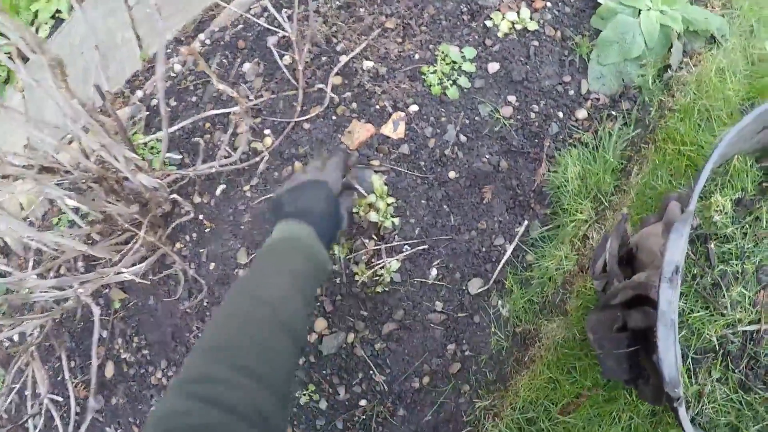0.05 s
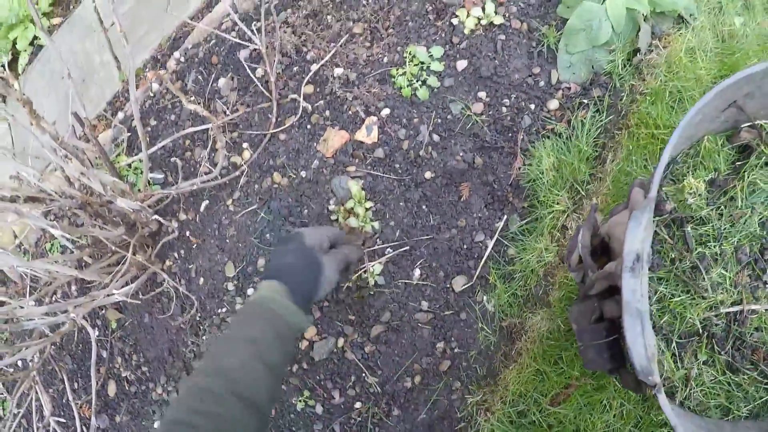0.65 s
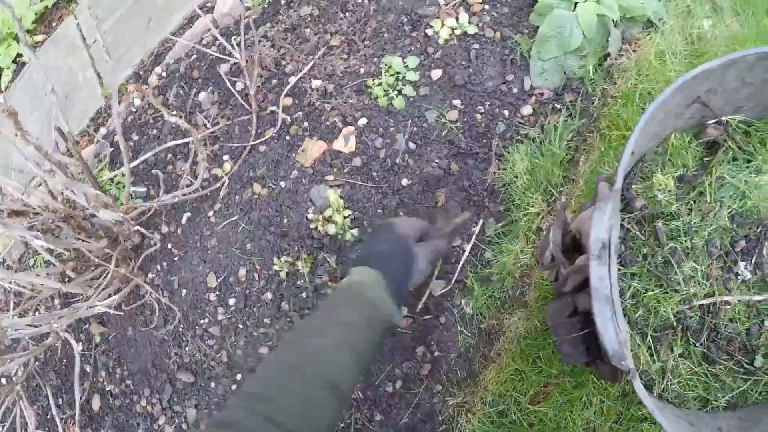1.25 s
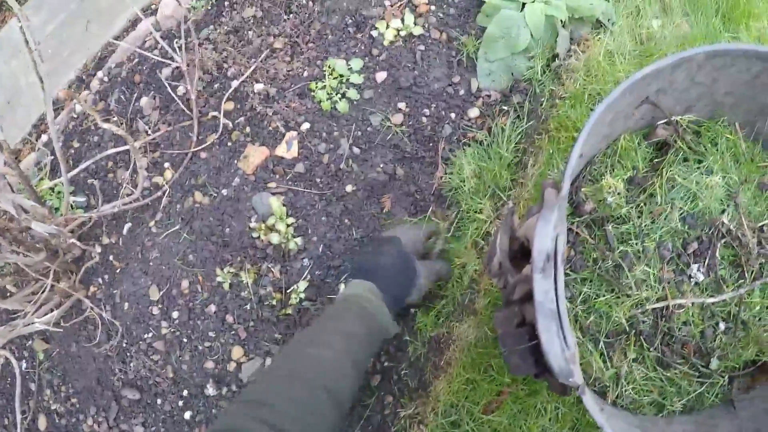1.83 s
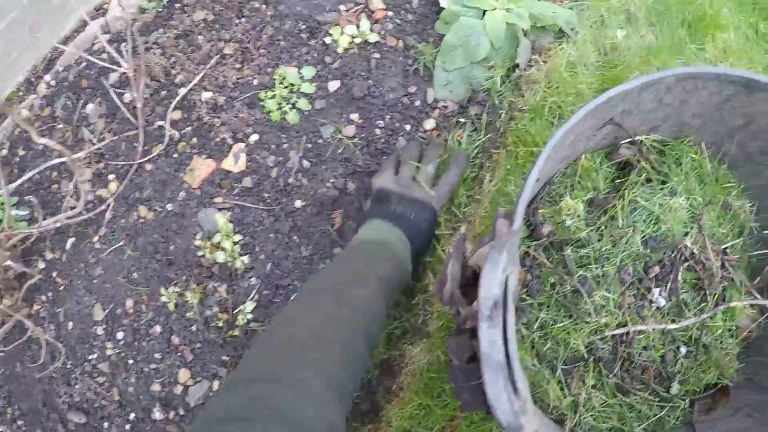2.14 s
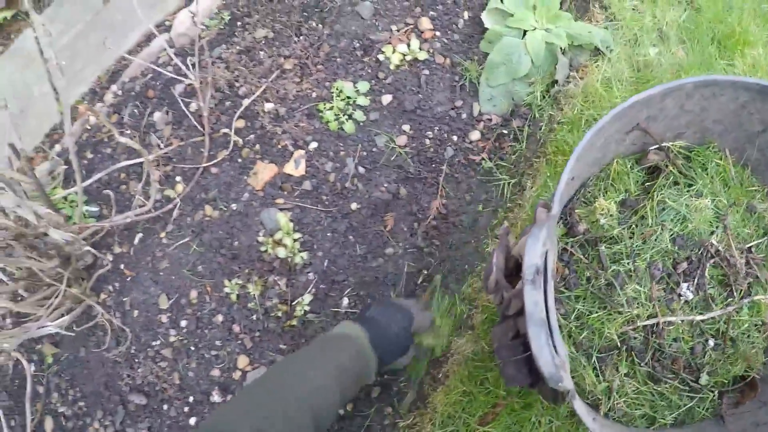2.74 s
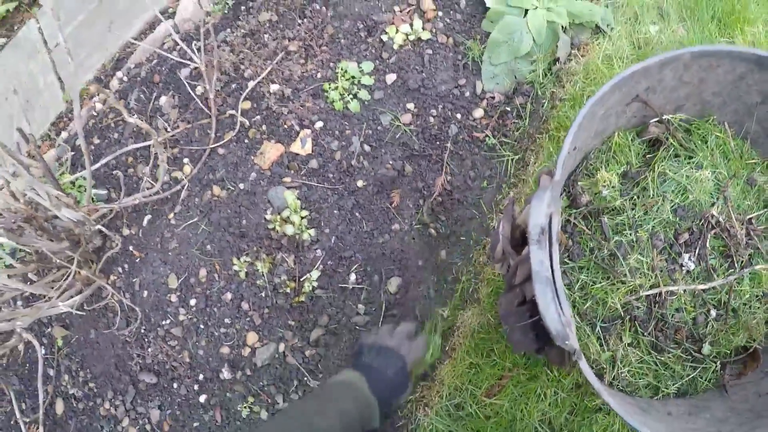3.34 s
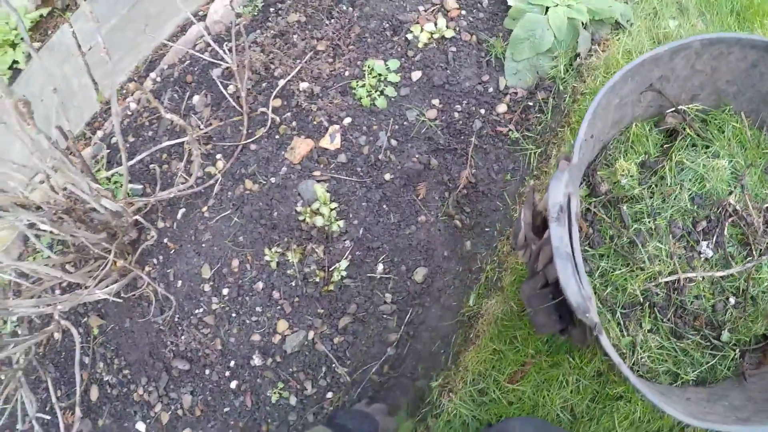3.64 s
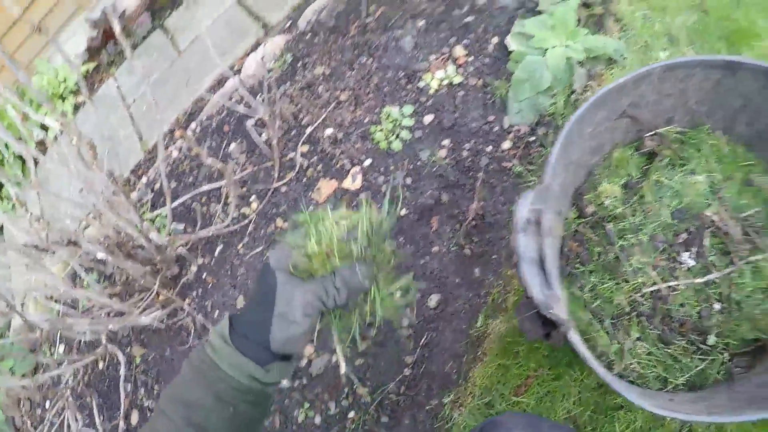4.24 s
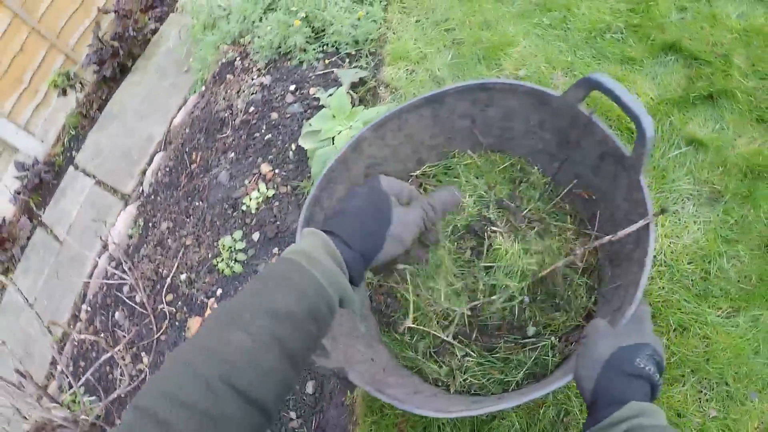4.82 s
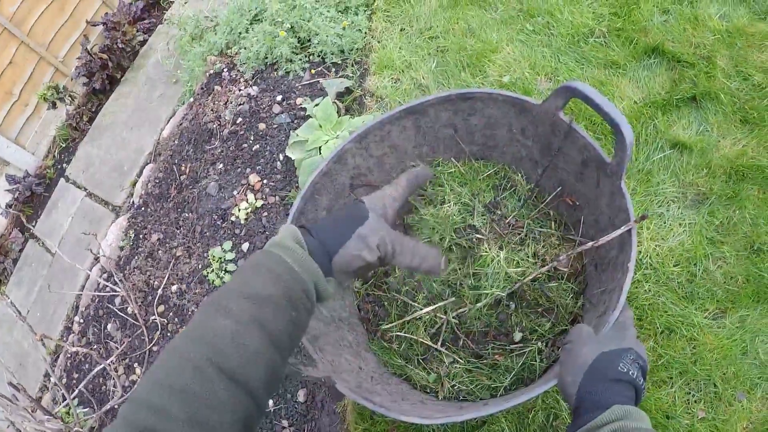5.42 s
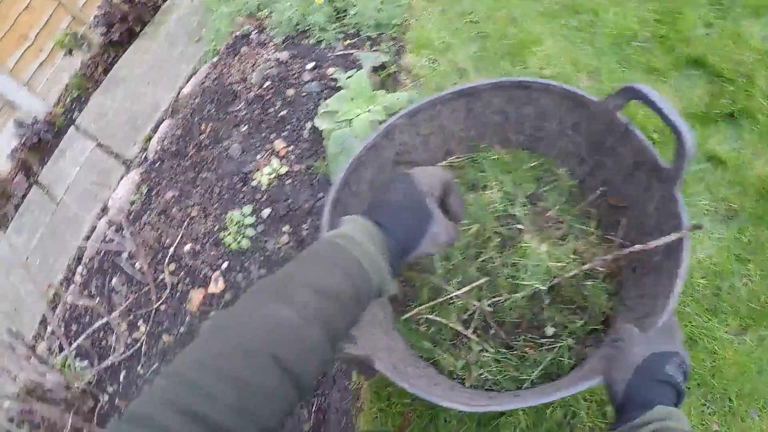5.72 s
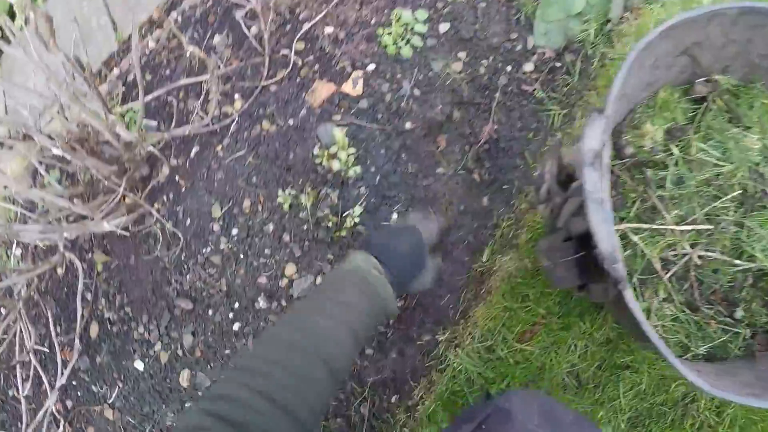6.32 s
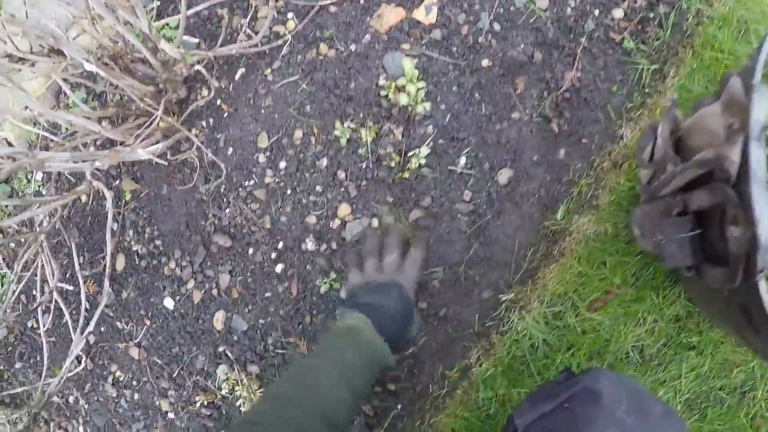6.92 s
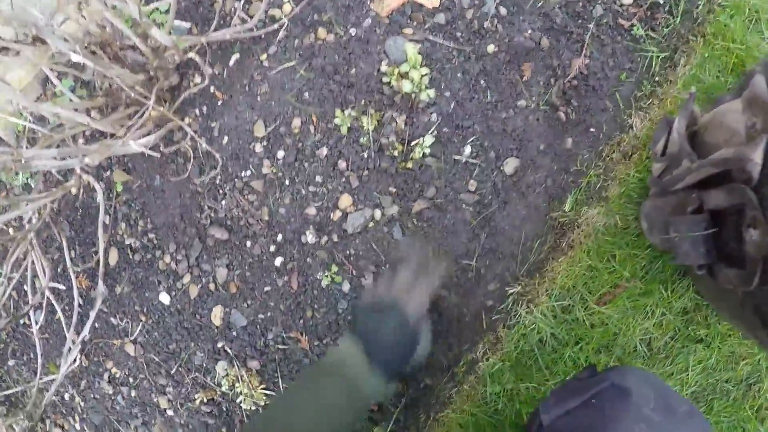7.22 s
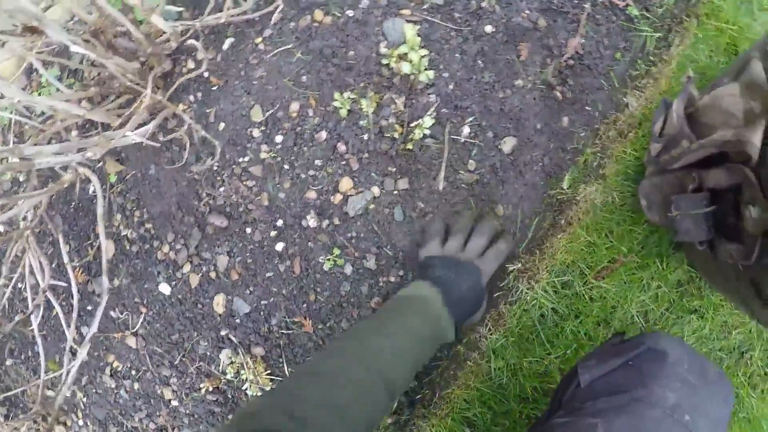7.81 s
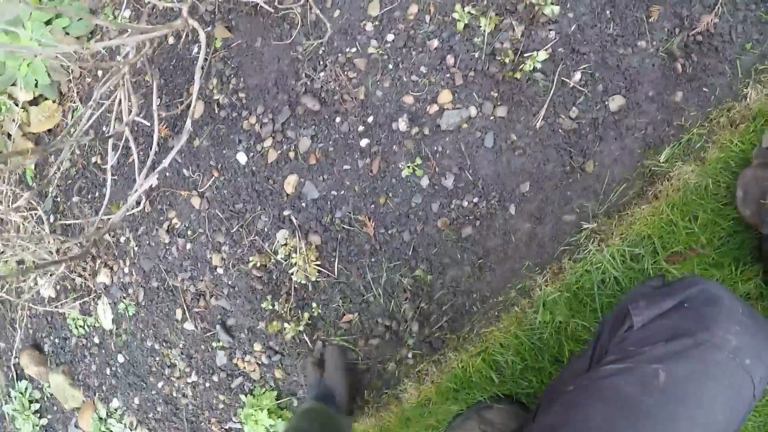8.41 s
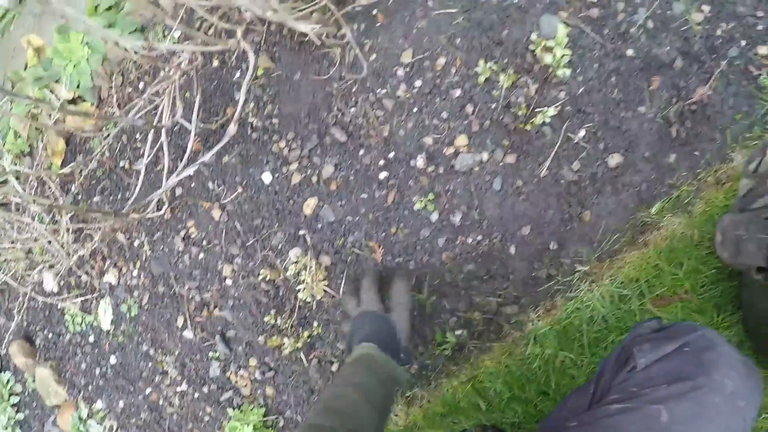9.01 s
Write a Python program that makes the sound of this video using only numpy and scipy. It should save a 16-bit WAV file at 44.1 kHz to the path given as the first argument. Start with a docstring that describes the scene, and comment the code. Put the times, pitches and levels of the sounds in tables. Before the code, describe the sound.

A gloved hand weeds a flower bed, making short, gritty scuffs in the soil with tiny ticks of stones and stems. About halfway, weeds knock softly into a plastic tub, then the scuffing resumes. Birds chirp and whistle thinly, echoing off nearby houses, busiest just after the middle. A low rumble of air on the body-worn microphone runs underneath with distant traffic and hiss.

```python
"""A flower bed between houses, weeded by a gloved hand, heard from a small camera the gardener wears.
The glove scuffs the soil in sprays of tiny clicks, grit and stems tick, and a handful of weeds
knocks into a plastic tub. Warbled birdsong and thin high calls, all gliding whistles, echo off
the houses. Under them lie a low rumble of air on the microphone, far traffic, hiss and a faint whine."""
import sys
import numpy as np
from scipy import signal
from scipy.fft import rfft, irfft, next_fast_len
from scipy.io import wavfile
from scipy.ndimage import uniform_filter1d

SR = 44100
rng = np.random.default_rng(int(sys.argv[2]) if len(sys.argv) > 2 else 0)


def pcm_store(signal):
    """Save signal as 16-bit PCM."""
    levels = np.round(np.clip(np.atleast_2d(signal), -1, 1) * 32767)
    wavfile.write(sys.argv[1], SR, levels.astype(np.int16).T)


N = 403910
TIME = np.arange(N) / SR


def amp(db):
    """Decibels to gain."""
    return 10 ** (np.asarray(db) / 20)


def unit_rms(x):
    """Scales to rms 1."""
    return x / np.sqrt(np.mean(x ** 2) + 1e-20)


def add(mix, start_s, sound):
    """Mixes a sound in at start_s."""
    part = mix[max(round(start_s * SR), 0):][:len(sound)]
    part += sound[:len(part)]


def bin_gains(spectrum, size):
    """A spectrum's gain at each FFT bin."""
    hz, db = np.transpose(spectrum)
    bin_hz = np.fft.rfftfreq(size, 1 / SR)
    return amp(np.interp(np.log(bin_hz + 1), np.log(hz), db))


def noise(spectrum):
    """Noise of rms 1 with the given spectrum."""
    size = next_fast_len(N)
    white = rfft(rng.standard_normal(size))
    return unit_rms(irfft(white * bin_gains(spectrum, size), size)[:N])


def drift(rate_hz):
    """One second of random wander, rms 1, mostly below rate_hz."""
    step = SR / rate_hz / 2
    knots = rng.standard_normal(int(SR / step) + 3)
    return unit_rms(np.interp(np.arange(SR) / step, np.arange(len(knots)), knots))


def impulse(spectrum, size=512):
    """Minimum-phase click with the given spectrum."""
    cepstrum = irfft(np.log(bin_gains(spectrum, size)))
    cepstrum[1:size // 2] *= 2
    cepstrum[size // 2 + 1:] = 0
    return unit_rms(irfft(np.exp(rfft(cepstrum))))


# Glove strokes through soil and grass. Each row: start in seconds, length in seconds, level in dB.
STROKES = [(.4, 0.027, -73), (0.433, .035, -64.5), (0.83, 0.038, -67.5), (1.66, 0.13, -85),
           (3.25, .25, -80), (4.687, 0.08, -62.5), (4.9, 0.36, -77), (6.967, 0.11, -60.5),
           (7.414, 0.27, -69), (7.956, 0.072, -60.5), (8.017, 0.044, -61), (8.543, 0.28, -67)]
# Rubbed soil. Each row: frequency in Hz, relative density in dB.
SOIL_SPECTRUM = [(200, 2), (900, -4), (2000, -1.5), (3500, 0), (4900, 6), (6200, -5), (9000, -10.5),
                 (14000, -10)]


def glove_scuffs(grains_per_s=1600, spread_db=4.0, idle_db=-82):
    """Soil crumbs roll under the glove: a spray of tiny clicks that swells with each stroke."""
    pressure = np.full(N, amp(idle_db))
    for start_s, length_s, db in STROKES:
        add(pressure, start_s, amp(db) * np.sin(np.linspace(0, np.pi, int(length_s * SR))))
    sizes = amp(spread_db * np.minimum(rng.exponential(1, N), 4)) * rng.choice([-1, 1], N)
    grains = sizes * (rng.random(N) < grains_per_s / SR)
    return pressure * unit_rms(signal.oaconvolve(grains, impulse(SOIL_SPECTRUM))[:N])


def loose_grit(stones_per_s=9.9, above_stroke_db=12.5):
    """Longer strokes knock small stones together at random moments. Returns rows like TICKS."""
    rows = []
    for start_s, length_s, db in STROKES:
        stones = rng.random((8, 2))[:round(stones_per_s * length_s)]
        for when, sharpness in stones:
            rows.append((start_s + when * length_s, db + above_stroke_db, sharpness))
    return rows


# Louder stones knocking and stems snapping. Each row: start in seconds, peak in dB, sharpness 0-1.
TICKS = [(.4517, -47, 0.45), (.84, -46, 0.6), (1.3846, -37.5, 1), (1.695, -50, 0), (4.718, -46.5, 0.33),
         (6.68, -50, 0.2), (7.025, -48, .7), (7.038, -41.5, 0.2), (7.528, -47.5, .1), (7.575, -50, .95),
         (7.6011, -38.5, 0.43), (8.03, -47, 0), (8.069, -51, 0.1), (8.754, -45, 0)]
# A dull grain and a sharp snap. Each row: frequency in Hz, relative density in dB.
GRIT_SPECTRUM = [(500, -32), (2000, -18), (3600, -9), (4800, 9), (6000, -10), (8000, -7.5), (14000, -25)]
SNAP_SPECTRUM = [(1000, -10), (4500, -14), (7500, -18), (8700, -7), (9700, -15), (11000, -13.5),
                 (12200, -12), (13300, -7), (15000, -14)]


def stones_and_stems(t60_s=0.014, crumble=0.43):
    """A stone or stem gives one click and a few milliseconds of crumbling."""
    out, t = np.zeros(N), np.arange(1024) / SR
    dull, sharp = impulse(GRIT_SPECTRUM), impulse(SNAP_SPECTRUM)
    for start_s, peak_db, sharpness in TICKS + loose_grit():
        force = crumble * rng.standard_normal(len(t)) * amp(-60 * t / t60_s)
        force[0] = 1
        click = np.convolve(force, (1 - sharpness) * dull + sharpness * sharp)
        add(out, start_s, amp(peak_db) * click / abs(click).max())
    return out


# Knocks on the tub. Each row: start in seconds, peak in dB, hardness as tilt in dB per octave.
TUB_KNOCKS = [(4.697, -44, 3.5), (5.945, -52, -3), (6.124, -45.5, -1)]
# Modes of its wall. Each row: frequency in Hz, relative level in dB, T60 in seconds.
TUB_MODES = [(175, 2.5, 0.16), (466, -9, 0.046), (977, 3, 0.044), (1440, -2, 0.03), (1650, -8.5, 0.042),
             (1895, -8, 0.046), (2670, -7, 0.023)]


def plastic_tub(brush=0.04, brush_t60_s=0.05):
    """Each blow bumps, then brushes the wall; soft ones ring mainly its lowest mode."""
    out, t = np.zeros(N), np.arange(SR // 4) / SR
    for start_s, peak_db, tilt_db in TUB_KNOCKS:
        ring = sum(amp(db + tilt_db * np.log2(hz) - 60 * t / t60_s) * np.sin(2 * np.pi * hz * t)
                   for hz, db, t60_s in TUB_MODES)
        force = brush * rng.standard_normal(len(t)) * amp(-60 * t / brush_t60_s)
        force[0] = 1
        knock = signal.fftconvolve(force, ring)
        add(out, start_s, amp(peak_db) * knock / abs(knock).max())
    return out


# Glides by kind of note. Each row: start and end in octaves from mid pitch, quiver as a share of pitch.
GLIDES = {"hold": (-.005, -.01, 0.012), "rise": (-.1, 0.063, 0.016), "fall": (.22, -0.23, 0.021),
          "dip": (0.157, 0.19, 0.024), "arch": (-0.257, -0.276, 0.029), "hook": (0.202, 0, 0.019),
          "plunge": (.42, -0.067, 0.023), "slur": (.11, -.11, 0.029), "buzz": (-0.041, .03, 0.081)}


def whistles(notes, quiver_hz, flutter_db, steady_after_s=0.0298):
    """Each bird note is a pure tone with the glide of its kind; long notes quiver less."""
    out = np.zeros(N)
    for start_s, length_s, mid_hz, db, kind in notes:
        start_oct, end_oct, quiver = GLIDES[kind]
        size = int(length_s * SR)
        glide_oct = np.interp(np.linspace(0, 1, size), [0, 0.5, 1], [start_oct, 0, end_oct])
        hz = mid_hz * 2 ** uniform_filter1d(glide_oct, size=size // 5, mode="nearest")
        hz *= 1 + quiver * min(1, steady_after_s / length_s) * drift(quiver_hz)[:size]
        swell = signal.windows.tukey(size, 0.3) * amp(db + flutter_db * drift(quiver_hz)[:size])
        add(out, start_s, swell * np.sqrt(2) * np.sin(2 * np.pi * np.cumsum(hz) / SR))
    return out


# Single notes. Each row: start and length in seconds, mid pitch in Hz, relative level in dB, kind.
SONG_NOTES = [(1.885, .06, 3380, -67.5, "rise"), (1.98, 0.022, 4560, -61.5, "hold"),
              (2.415, 0.067, 3320, -65.5, "dip"), (2.501, 0.041, 4520, -62, "plunge"),
              (2.773, 0.025, 5510, -63.5, "hold"), (2.804, 0.023, 3760, -63, "plunge"),
              (2.86, .036, 3980, -61.5, "hook"), (4.378, .028, 3890, -58, "dip"),
              (4.415, 0.037, 3480, -58.5, "fall"), (5.666, 0.035, 4980, -51.5, "arch"),
              (5.86, .029, 3696, -55.5, "dip"), (6.162, 0.042, 4410, -56.5, "arch"),
              (6.244, 0.021, 3300, -57.5, "dip"), (6.276, 0.026, 4260, -52, "hold"),
              (6.316, .036, 5200, -55.5, "arch"), (6.38, 0.03, 3960, -54.5, "fall"),
              (6.442, .04, 3660, -55, "dip"), (6.534, 0.037, 4100, -59, "hook"),
              (6.62, 0.048, 3710, -57.5, "hook"), (6.677, .17, 3640, -65, "rise"),
              (7.84, 0.1, 4940, -74, "slur"), (7.95, 0.054, 3550, -61, "buzz"),
              (8.095, .05, 3013, -63, "hook"), (8.208, 0.038, 3190, -64, "hold"),
              (8.32, .16, 3450, -77, "buzz")]
# An upward flick, then a louder downward slur. Rows like SONG_NOTES, timed from the syllable's start.
SYLLABLE = [(0, .018, 4910, -8, "rise"), (0.016, 0.043, 4075, 0.5, "slur")]
# Repeats of the syllable. Each row: start in seconds, relative level in dB.
REFRAIN = [(5.449, -54), (5.612, -53.5), (5.811, -53)]
# Climbing twitters. Each row: start and length in seconds, start and end in Hz, relative level in dB.
TWITTERS = [(1.362, 0.19, 3670, 4880, -68), (4.42, 0.081, 3860, 4080, -63.5), (4.539, .12, 4470, 4710, -61)]


def songbird(twitter_step_s=0.018, twitter_note_s=0.0214, scatter_oct=0.06):
    """A bird whistles single notes, a repeated syllable and twitters of scattered pitch."""
    notes = list(SONG_NOTES)
    for start_s, db in REFRAIN:
        for delay_s, length_s, hz, part_db, kind in SYLLABLE:
            notes.append((start_s + delay_s, length_s, hz, db + part_db, kind))
    for start_s, length_s, start_hz, end_hz, db in TWITTERS:
        for i, delay_s in enumerate(np.arange(0, length_s, twitter_step_s)):
            hz = start_hz + (end_hz - start_hz) * delay_s / length_s
            hz *= 2 ** (scatter_oct * rng.uniform(-0.97, 1))
            notes.append((start_s + delay_s, twitter_note_s, hz, db, ("rise", "arch")[i % 2]))
    return whistles(notes, quiver_hz=127, flutter_db=2)


# High calls. Each row: start and length in seconds, mid pitch in Hz, relative level in dB, kind.
HIGH_CALLS = [(.8, 0.084, 8200, -73, "hold"), (1.0, .11, 8500, -77, "buzz"), (4.25, .1, 8300, -78, "buzz"),
              (4.895, .1, 8450, -66.5, "buzz"), (5.03, 0.17, 8150, -73, "hold"),
              (7.648, .065, 8300, -75, "hold"), (8.69, .14, 7700, -75, "buzz"),
              (9.05, 0.11, 8200, -70.5, "slur")]


def calling_bird():
    """A second bird whistles thin calls near 8 kHz."""
    return whistles(HIGH_CALLS, quiver_hz=131, flutter_db=0)


def garden_echoes(sound, shrubs_db, walls_db, t60_s, wall_delay_s, echoes_per_s=2000):
    """Fences and shrubs scatter a sound at once; house walls send a later wave of echoes."""
    t = np.arange(SR) / SR
    decay = amp(-60 * t / t60_s)
    out = sound.copy()
    for phase in (0, np.pi / 2):  # two echo patterns trade places as the listener moves
        near, far = rng.standard_normal((2, SR)) * (rng.random((2, SR)) < echoes_per_s / SR)
        near *= decay * (t > 0.008)
        far *= decay * (t > wall_delay_s)
        echoes = amp(shrubs_db) * near / np.linalg.norm(near) + amp(walls_db) * far / np.linalg.norm(far)
        out += signal.fftconvolve(sound * np.cos(np.pi * TIME + phase), echoes)[:N]
    return out


# Rumble, calmer while the gardener pauses over the tub. Each row: time in seconds, level in dB.
RUMBLE_LEVELS = [(0, -43), (2.7, -42.5), (3.5, -43.5), (4.6, -51), (5.6, -50), (7.5, -40), (9.16, -45)]
# Its spectrum. Each row: frequency in Hz, relative density in dB.
RUMBLE_SPECTRUM = [(4, -17), (10, -13), (18, 0), (26, 3), (33, -4), (42, -10.5), (52, -17), (70, -29.5),
                   (140, -58), (600, -100)]


def microphone_rumble():
    """Moving air and the wearer's sway shake the microphone."""
    rumble = noise(RUMBLE_SPECTRUM)
    running_rms = np.sqrt(uniform_filter1d(rumble ** 2, size=9000) + 1e-6)
    return rumble / running_rms * amp(np.interp(TIME, *np.transpose(RUMBLE_LEVELS)))


# Tyre roar, engine drone and hiss. Each row: frequency in Hz, relative density in dB.
TYRE_SPECTRUM = [(25, -6), (60, 13), (95, 8.5), (160, 1), (240, -5), (400, -5.5), (510, -2), (650, 1.5),
                 (830, -3.5), (980, -1.5), (1130, 1.5), (1300, -7.5), (1550, -16.5), (6000, -50)]
ENGINE_SPECTRUM = [(40, -22), (110, -1), (190, -2.5), (350, -11), (1500, -70)]
HISS_SPECTRUM = [(300, 0.5), (1500, 1.5), (2300, 2), (3000, 0), (4000, 1), (4900, 0), (5700, -2.5),
                 (7200, -5.5), (9000, -7), (11000, -9), (15000, -9.5)]
# The engine's approach. Each row: time in seconds, level in dB.
ENGINE_LEVELS = [(0, -83), (5, -80), (7.5, -70), (9.16, -70)]


def far_traffic(tyres_db=-60, hiss_db=-67):
    """Tyres roar on far roads and one dull engine draws nearer, with a smooth hiss."""
    tyres = noise(TYRE_SPECTRUM) * amp(tyres_db)
    engine = noise(ENGINE_SPECTRUM) * amp(np.interp(TIME, *np.transpose(ENGINE_LEVELS)))
    return tyres + engine + noise(HISS_SPECTRUM) * amp(hiss_db)


# The camera's whine. Each row: frequency in Hz, linewidth in Hz, level in dB.
WHINE_TONES = [(4765, 105.6, -80.5), (8600, 8, -83.5), (9480, 150, -88), (14000, 360, -90.5)]


def camera_whine():
    """Faint steady tones, each widened by a random walk in phase."""
    out = np.zeros(N)
    for hz, width_hz, db in WHINE_TONES:
        wander = np.cumsum(rng.standard_normal(N)) * np.sqrt(2 * np.pi * width_hz / SR)
        out += amp(db) * np.sqrt(2) * np.sin(2 * np.pi * hz * TIME + wander)
    return out


def scene(song_gain_db=-2, calls_gain_db=-3):
    """Dry handwork up close, echoing birds farther off, over the background. Mono."""
    background = microphone_rumble() + far_traffic() + camera_whine()
    handwork = glove_scuffs() + plastic_tub() + stones_and_stems()
    calls = garden_echoes(calling_bird(), shrubs_db=-1.5, walls_db=-6, t60_s=0.6, wall_delay_s=0.077)
    song = garden_echoes(songbird(), shrubs_db=-1.5, walls_db=-5.5, t60_s=0.41, wall_delay_s=0.075)
    return (handwork + amp(song_gain_db) * song + amp(calls_gain_db) * calls + background)[None]


def record(dry, cutoff_hz=15300):
    """The camera's band limit: a steep low-pass."""
    taps = signal.firwin(801, cutoff_hz, window=("kaiser", 9), fs=SR)
    return signal.oaconvolve(dry, taps[None], "same")


dry = scene()
out = record(dry)
pcm_store(out)
```